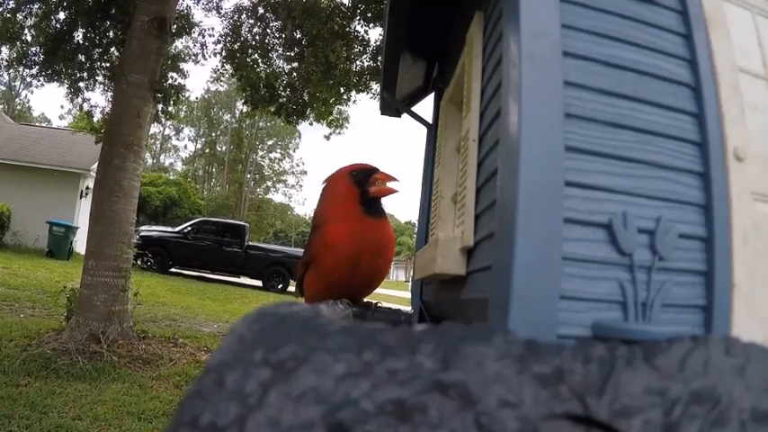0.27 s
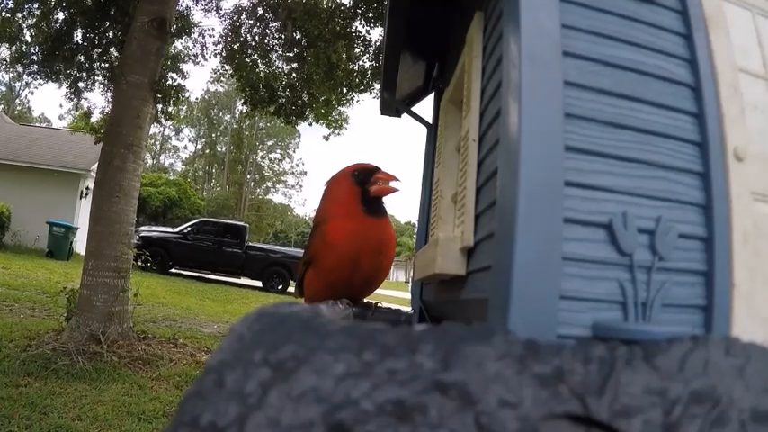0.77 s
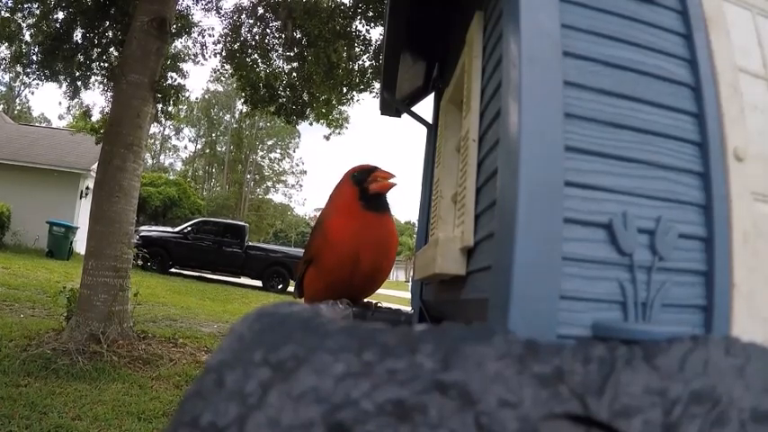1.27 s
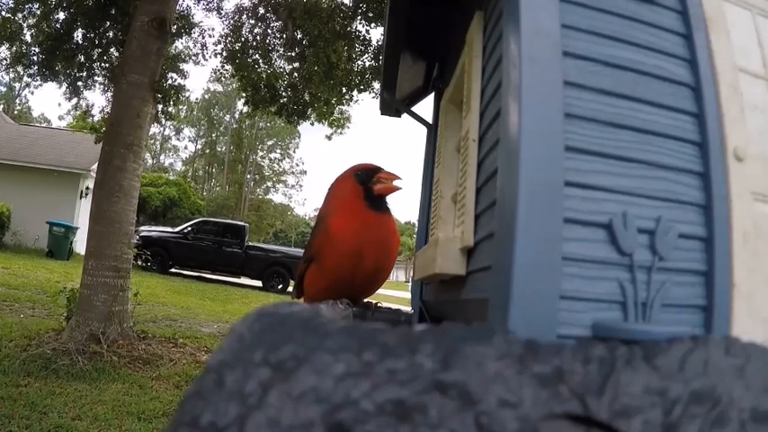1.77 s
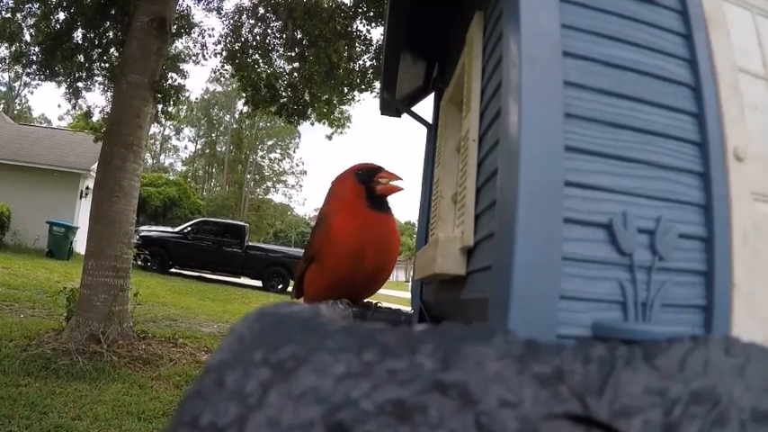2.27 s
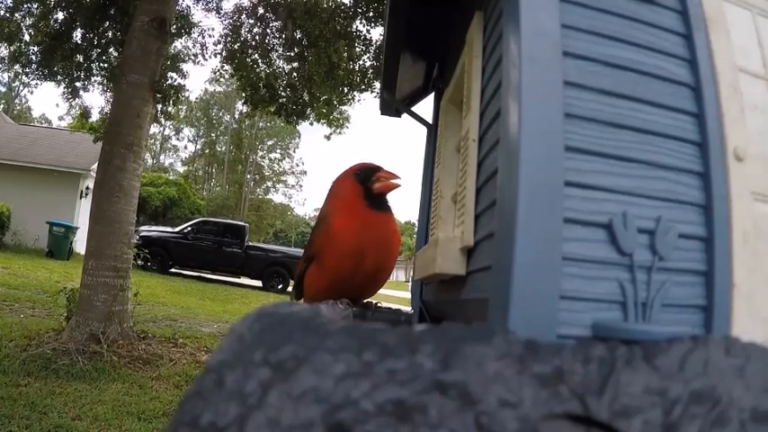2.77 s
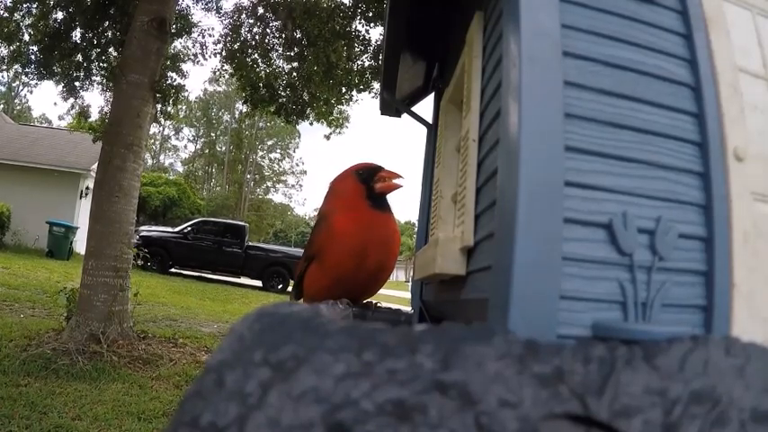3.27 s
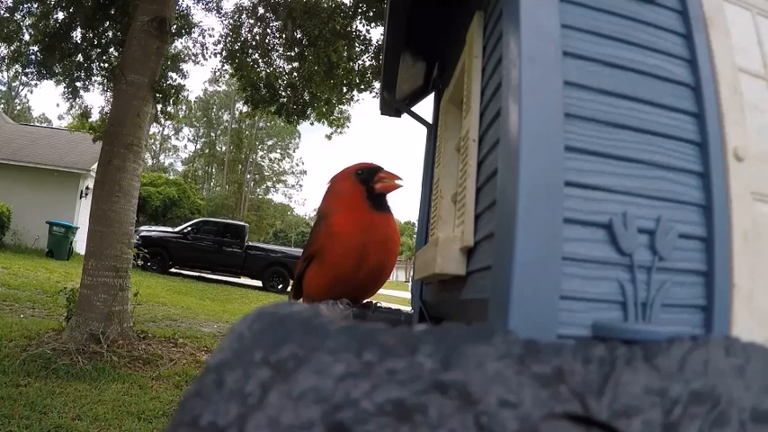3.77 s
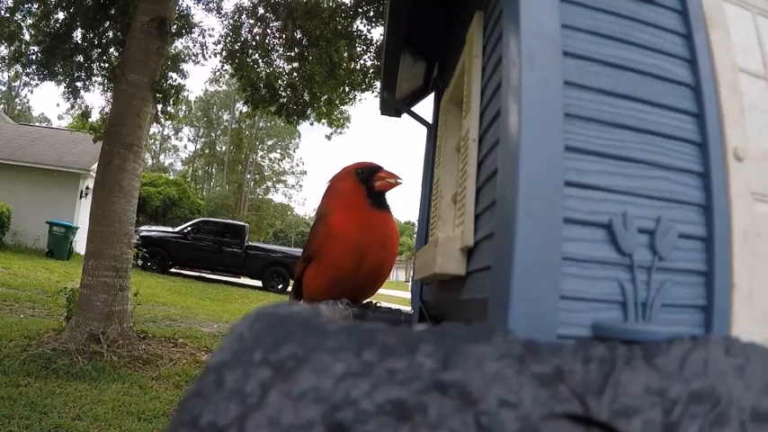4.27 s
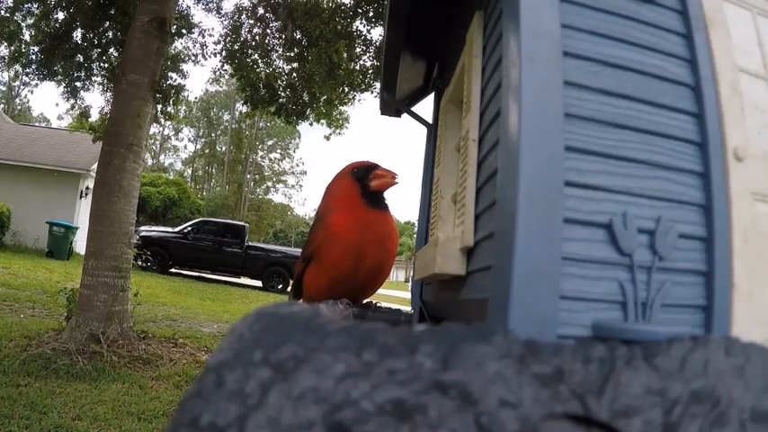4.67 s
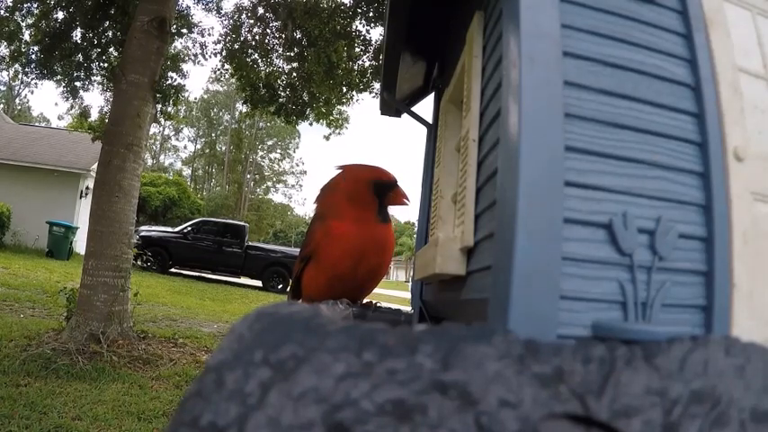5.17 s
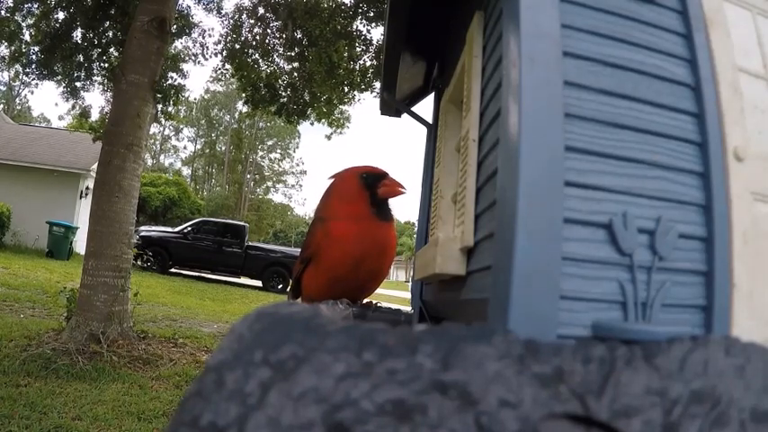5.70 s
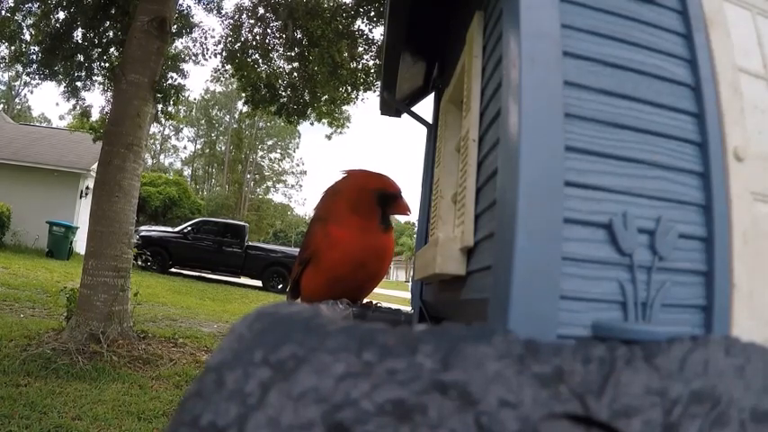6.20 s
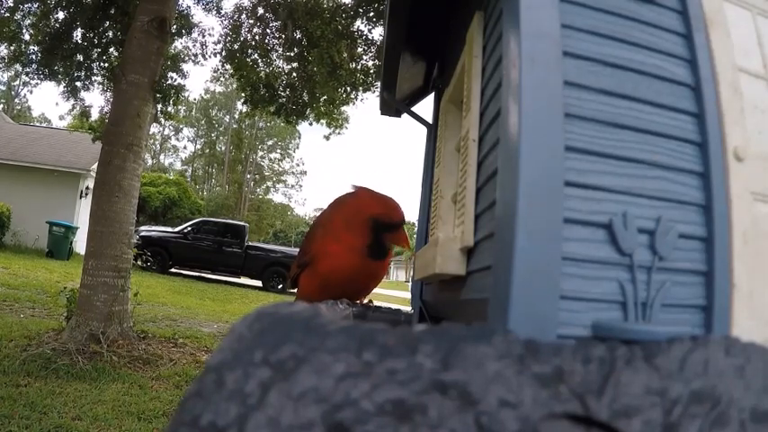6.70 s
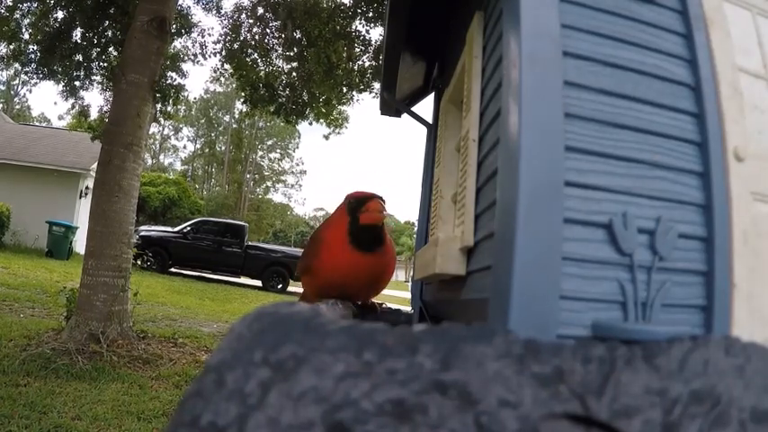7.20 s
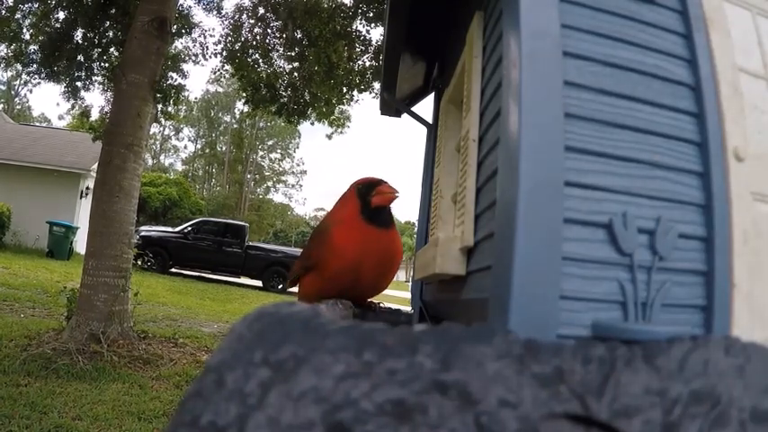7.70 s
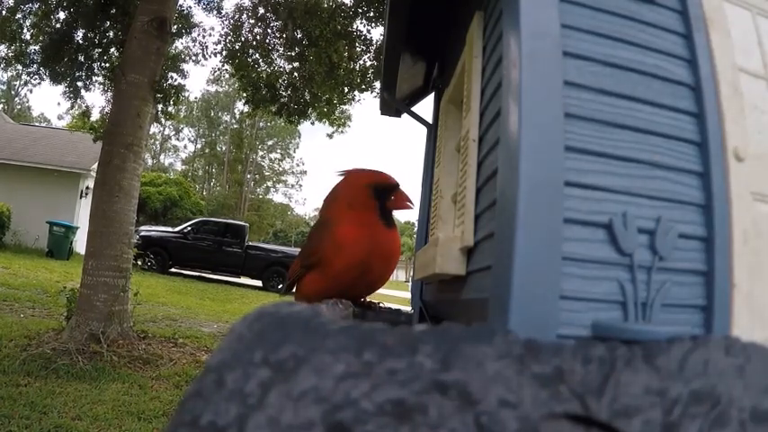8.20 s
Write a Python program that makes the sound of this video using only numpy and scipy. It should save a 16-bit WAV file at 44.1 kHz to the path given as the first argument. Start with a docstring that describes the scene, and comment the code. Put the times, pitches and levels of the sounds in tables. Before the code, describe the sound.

A songbird's slurred whistles and a closer bird's thin chips and beak clicks sound over gusty low wind rumble.

```python
"""Two cardinals in a front yard

The farther bird's whistles, swooping slurs and runs of arched notes, ring between house walls and trees.
The near bird's thin high chips, dry beak clicks and soft perch bumps fall in between. Wind buffets the
microphone, and far off a vehicle drones in the hum of the neighbourhood, under a faint hiss and whine."""
import sys
import numpy as np
from scipy import signal
from scipy.fft import rfft, irfft
from scipy.io import wavfile
from scipy.ndimage import uniform_filter1d, map_coordinates

SR = 44100
rng = np.random.default_rng(int(sys.argv[2]) if len(sys.argv) > 2 else 0)


def to_wav(sig):
    """Store sig (one row per channel, or 1-D mono) as 16-bit WAV at the path in sys.argv[1].

    Samples outside -1..1 are clipped; the rate is SR.
    """
    pcm = np.clip(np.atleast_2d(sig), -1, 1) * 32767
    pcm = np.round(pcm).astype(np.int16)
    wavfile.write(sys.argv[1], SR, pcm.T)  # frames by channels


N = 372644
TIME = np.arange(N) / SR

# A farther cardinal's swooping phrases. Each row: start in seconds, time stretch, levels in dB of the
# down-slur, hook, up-slur and closing low note, then direct-path gains in dB of down-slur and up-slur.
SWOOP_PHRASES = [(-.15, .95, -54, -49.5, -50.5, -55.5, 2, 3), (.179, .99, -50.7, -53, -47.2, -57, 2, 2),
                 (.528, 1, -53.5, -53.5, -47.5, -56.5, 1, 2), (5.687, .95, -58, -51.5, -51, -52.5, 1, -2),
                 (6.017, 1.01, -54.5, -50.3, -51.2, -52, .5, -2),
                 (6.351, .98, -55.7, -49, -50.7, -51.5, -.5, -2.5),
                 (6.685, .98, -53, -46.5, -50, -51.3, 1, -1.5),
                 (7.033, .98, -52, -50, -51.5, -49, 1.5, -1.5)]
# The four gestures of a swoop. Each row: seconds into the phrase, pitch in Hz, relative level in dB.
SWOOP_DOWN = [(-.012, 5900, -30), (-.001, 4930, -14), (.007, 4660, -4), (.022, 4330, 2.5), (.031, 4210, 0),
              (.04, 4110, -7), (.049, 3880, -1), (.066, 3250, -6), (.088, 2700, -11)]
SWOOP_HOOK = [(.09, 2700, -10), (.104, 2850, -7), (.111, 3130, -3), (.115, 3080, -1), (.118, 2500, -14),
              (.124, 1800, -21)]
SWOOP_UP = [(.122, 3680, -18), (.134, 3900, -9), (.142, 4280, -1), (.148, 4700, -2.5), (.154, 4950, -7),
            (.158, 5200, -20)]
SWOOP_CLOSE = [(.193, 2420, -20), (.209, 2560, -11), (.223, 2630, -2.5), (.236, 2560, -8.5),
               (.246, 2300, -14), (.26, 2130, -15)]
# Runs of arched notes. Each row: start in seconds, length in seconds, top pitch in Hz, level in dB,
# direct-path gain in dB as the head turns.
ARCHED_NOTES = [(1.242, .108, 2915, -54, -3), (1.477, .128, 2925, -53.7, -1.5),
                (1.733, .132, 2960, -53.7, -2), (1.993, .126, 2975, -51.5, 0),
                (2.25, .127, 2965, -52.2, 1.5), (4.642, .112, 2920, -56, -1),
                (4.885, .118, 2920, -53.8, -.5), (7.502, .115, 2980, -57, 1),
                (7.753, .113, 2965, -56.4, 2.3), (8.002, .123, 2970, -56, 2.3),
                (8.258, .124, 2975, -55, 2.3)]
# One arch. Each row: share of its length, share of the top pitch, relative level in dB.
ARCH_SHAPE = [(0, .83, -18), (.12, .875, -6.5), (.28, .955, -3.5), (.42, .99, -1), (.63, 1, .5),
              (.79, .988, 0), (.89, .94, -2), (1, .84, -7.5)]
# Echoes from walls close by and house fronts across the street. Each row: delay in seconds, gain in dB.
NEAR_WALLS = [(.0045, -13), (.016, -18), (.031, -20), (.052, -18)]
HOUSE_FRONTS = [(.105, -16), (.215, -18), (.33, -19)]


def song(gain_db=-1.7, low_direct_db=-2, trees_db=-1.3, beam_hz=3300):
    """The farther bird's song reaches the microphone directly, off the walls and through the trees."""
    lead = .5  # seconds of room for a phrase already under way
    direct, high, low = np.zeros((3, N + SR // 2))
    # below beam_hz the narrowing beak sends less of a slur straight to the microphone
    beam = signal.butter(4, beam_hz, "high", fs=SR, output="sos")
    gestures = (SWOOP_DOWN, SWOOP_HOOK, SWOOP_UP, SWOOP_CLOSE)
    registers = (high, low, high, low)
    for s, stretch, *levels, down_direct_db, up_direct_db in SWOOP_PHRASES:
        paths = (down_direct_db, low_direct_db, up_direct_db, low_direct_db)
        for gesture, register, db, direct_db in zip(gestures, registers, levels, paths):
            start = lead + s + gesture[0][0] * stretch
            note = undb(db) * whistle(gesture, stretch, waver=.01, flutter_db=2.7)
            add(register, start, note)
            aimed = signal.sosfilt(beam, note) if register is high else note
            add(direct, start, undb(direct_db) * aimed)
    for s, length, hz, db, direct_db in ARCHED_NOTES:
        note = undb(db) * whistle(ARCH_SHAPE, length, hz, waver=.0015, flutter_db=2.8)
        add(low, lead + s, note)
        add(direct, lead + s, undb(direct_db) * note)
    # leaves and air swallow the high slurs sooner than the lower notes
    high_scatter = foliage(high, t60=.75, early_t60=.17, early_db=.5, rise=.007, patchy_db=2)
    low_scatter = foliage(low, t60=1.2, early_t60=.22, early_db=0, rise=.008)
    out = direct + undb(trees_db) * (high_scatter + low_scatter)
    for delay, db in NEAR_WALLS:
        add(out, delay, undb(db) * (high + low))
    for delay, db in HOUSE_FRONTS:
        add(out, delay, undb(db) * low)
    return undb(gain_db) * out[-N:]


def whistle(gesture, stretch=1, pitch=1, waver=.0053, flutter_db=1.5):
    """The syrinx slides one pure tone along a gesture; pitch and pressure tremble a little."""
    s, hz, db = np.transpose(gesture)
    s = s * stretch
    t = np.arange(s[0], s[-1], 1 / SR)
    pitch_drift, level_drift = [map_coordinates(knots, [(t - s[0]) * 150], order=2, mode="wrap")
                                for knots in rng.standard_normal((2, 40))]
    glide = pitch * uniform_filter1d(np.interp(t, s, hz), size=120)
    phase = 2 * np.pi * np.cumsum(glide * (1 + waver * pitch_drift)) / SR
    level = undb(np.interp(t, s, db) + flutter_db * level_drift)
    to_edge = np.minimum(t - s[0], s[-1] - t)
    fade = np.sin(np.pi / 2 * np.clip(to_edge / .0025, 0, 1)) ** 2
    return np.sqrt(2) * fade * level * np.sin(phase)


def foliage(x, t60, early_t60, early_db, rise, patchy_db=-1.0):
    """Eaves, trunks and leaves round the yard scatter a quick dense cloud, then a longer faint tail."""
    t = np.arange(SR) / SR
    fade = undb(-60 * t / t60) + undb(early_db - 60 * t / early_t60)
    # each tree or wall sends back a clump of echoes of its own strength
    clumps = undb(patchy_db * drift(123.7)[:SR])
    response = rng.standard_normal(SR) * fade * clumps * np.clip(t / rise, 0, 1)
    return signal.fftconvolve(x, response / np.linalg.norm(response))[:len(x)]


# The near cardinal's thin high calls. Each row: start in seconds, top pitch in Hz, direct level in dB,
# echo level in dB before a common lift, echo rise in seconds.
CHIP_CALLS = [(1.414, 8030, -68, -58.5, .016), (3.223, 8020, -49.5, -57, .002),
              (4.877, 7780, -59, -59.3, .002), (6.913, 7620, -60, -60.5, .002),
              (8.224, 7780, -60, -58.5, .002)]
# One chip. Each row: time in seconds, share of the top pitch, relative level in dB.
CHIP_SHAPE = [(0, .73, -5), (.003, .81, -1), (.006, .91, -4), (.009, .96, 1), (.012, .98, .5),
              (.0155, 1, -12)]


def chips(echo_lift_db=5.5):
    """Very short rising contact notes; the turn of the head sets how much comes straight to the mic."""
    out = np.zeros(N)
    for s, hz, direct_db, echo_db, rise in CHIP_CALLS:
        note = np.pad(whistle(CHIP_SHAPE, pitch=hz), (0, SR // 2))
        echo = foliage(note, t60=.43, early_t60=.098, early_db=-10, rise=rise)
        add(out, s, undb(direct_db) * note)
        add(out, s, undb(echo_db + echo_lift_db) * echo)
    return out


# Snaps of the beak. Each row: start in seconds, level in dB, body and tip gains in dB,
# rebound delay in seconds, rebound gain in dB.
BEAK_CLICKS = [(1.4055, -57, -13, -28, .0075, -7), (2.285, -61, -8, 2, .005, -10),
               (3.586, -43.3, -3, 2.5, .0011, -12), (4.06, -63, -16, -22, .006, -2)]
# Beak resonances, two each for body, edge and tip. Each row: centre in Hz, width in Hz, gain in dB.
BEAK_MODES = [(1900, 1200, -7), (4810, 400, 0), (6400, 700, -8), (9000, 900, -16), (11800, 800, -10),
              (12900, 800, 0)]


def beak(scrape=.27, scrape_decay_s=.00023, wall_db=-10):
    """The beak snaps shut and rebounds more softly, and the nearest wall answers."""
    direct = np.zeros(N)
    t = np.arange(256) / SR
    for s, db, body_db, tip_db, rebound_s, rebound_db in BEAK_CLICKS:
        for delay, contact_db in ((0, db), (rebound_s, db + rebound_db)):
            snap = (t == 0) + scrape * rng.standard_normal(len(t)) * np.exp(-t / scrape_decay_s)
            rings = [undb(mode_db) * resonate(snap, hz, width) for hz, width, mode_db in BEAK_MODES]
            body, edge, tip = sum(rings[:2]), sum(rings[2:4]), sum(rings[4:])
            click = undb(body_db) * body + edge + undb(tip_db) * tip
            add(direct, s + delay, undb(contact_db) * unit(click))
    out = direct + undb(-7) * foliage(direct, t60=.05, early_t60=.022, early_db=-5, rise=.0034)
    add(out, NEAR_WALLS[0][0], undb(wall_db) * direct)
    return out


# The near bird shifts. Each row: start in seconds, peak level in dB, ring in Hz, push in seconds.
PERCH_BUMPS = [(6.172, -42.5, 158.3, 0.021), (6.838, -48, 470, 0.0046), (6.852, -49, 543, 0.0035),
               (6.871, -45, 428, 0.0036)]


def feet():
    """Each soft push knocks on the hollow perch."""
    out = np.zeros(N)
    t = np.arange(4096) / SR
    for s, db, hz, push in PERCH_BUMPS:
        force = rng.standard_normal(len(t)) * t * np.exp(-t / push)
        knock = resonate(resonate(force, hz, .5 * hz), hz, .5 * hz)
        add(out, s, undb(db) * knock / np.abs(knock).max())
    return out


# The breeze right on the microphone. Each row: time in seconds, level in dB.
BREEZE_LEVELS = [(0, -28), (.55, -41), (.9, -36), (1.149, -54), (1.7, -43), (2.1, -62), (2.4, -34.5),
                 (2.7, -44.5), (3.3, -36.5), (4.1, -41.5), (4.7, -40), (5.4, -42), (5.8, -35.5),
                 (6.549, -43.5), (6.902, -38), (7.25, -44.5), (7.8, -33.5), (8.45, -39)]
# Gusts that stand out of it. Each row: time of the peak in seconds, length in seconds, level in dB.
WIND_GUSTS = [(0.003, 0.091, -20), (0.116, 0.1, -20.5), (0.312, 0.078, -22), (2.29, 0.068, -36),
              (3.46, 0.12, -35), (3.589, 0.04, -29.5), (3.769, 0.13, -21), (3.947, 0.11, -24.5),
              (4.257, 0.1, -31.5), (4.42, 0.059, -30), (5.003, 0.14, -30.5), (5.279, 0.093, -26),
              (5.49, 0.23, -23.5), (6.201, 0.086, -30), (6.77, 0.11, -31.5), (7.081, 0.11, -34),
              (7.349, 0.082, -31.5), (7.644, 0.16, -25.5), (7.86, 0.083, -33.5), (8.13, 0.087, -25.5),
              (8.251, 0.06, -24.5)]
# Spectra of slow heavy eddies and quick small ones. Each row: frequency in Hz, relative level in dB.
HEAVY_EDDIES = [(12, -6.5), (20, 6.5), (29, -1), (48, -2.5), (65, -9.5), (110, -30)]
SMALL_EDDIES = [(40, -11.5), (62, -9), (85, -4), (120, -11), (170, -25), (300, -34.5), (600, -50)]


def wind(puffs_per_s=8.7, puff_db=3.5, flutter_db=-15.5, lull_db=-48):
    """Gusts and a puffing breeze push on the microphone; a harder push sheds more small eddies."""
    s, db = np.transpose(BREEZE_LEVELS)
    push = undb(np.interp(TIME, s, db) + puff_db * drift(puffs_per_s))
    for peak, length, gust_db in WIND_GUSTS:
        gust = undb(gust_db) * np.exp(-(2 * (TIME - peak) / length) ** 2)
        push = np.hypot(push, gust)
    flutter = np.hypot(undb(lull_db), undb(flutter_db) * push)
    return push * eddies(HEAVY_EDDIES) + flutter * eddies(SMALL_EDDIES)


def eddies(spectrum):
    """Turbulence of even strength, so that the wind's push alone sets its level."""
    turbulence = noise(spectrum)
    return turbulence / np.sqrt(uniform_filter1d(turbulence ** 2, size=4000))


# An engine a long way off. Each row: time in seconds, firing rate in Hz, level in dB.
ENGINE_RUN = [(0, 42.72, -56), (.55, 43.33, -39), (1.1, 42.63, -54), (1.6, 44.03, -50), (1.951, 54.05, -55),
              (2.3, 48.8, -49), (2.7, 46.63, -48.5), (3.399, 43.2, -56), (4.301, 39.97, -47.5),
              (6, 39.6, -71), (8.45, 36.8, -68)]
# Its exhaust tones. Each row: multiple of the firing rate, relative level in dB.
EXHAUST_ORDERS = [(2, -3), (2.5, -14.5), (3, -8.5), (4, -16.5)]


def vehicle(wander=.0112, rough_db=4.0, gain_db=1.5):
    """Only the lowest exhaust orders of a far engine carry into the yard."""
    s, hz, db = np.transpose(ENGINE_RUN)
    firing_hz = np.interp(TIME, s, hz) * (1 + wander * drift(15))
    phase = 2 * np.pi * np.cumsum(firing_hz) / SR
    drone = sum(undb(order_db + rough_db * drift(16)) * np.sin(order * phase)
                for order, order_db in EXHAUST_ORDERS)
    return unit(drone) * undb(np.interp(TIME, s, db) + gain_db)


# The steady air of the neighbourhood, low and high. Each row: frequency in Hz, relative level in dB.
TRAFFIC_SPECTRUM = [(88, -27.5), (150, 6.5), (167, 2), (214, -2), (269, -4.5), (313, -3.5), (357, -3),
                    (458, -0.5), (516, -3.5), (557, -6.5), (805, -14.5), (917, -13.5), (1180, -20),
                    (1370, -21), (2000, -25.5), (2600, -50), (4400, -120)]
HISS_SPECTRUM = [(1180, -8.5), (2000, 1.5), (2370, 4), (2560, 5), (3000, 5.5), (3240, 2), (4820, 3),
                 (5200, 1.5), (6480, -2), (7110, -3.5), (10100, -7.5), (13500, -9), (14100, 2), (14700, -9),
                 (15100, -8)]
# Tones from the camera's electronics. Each row: frequency in Hz, level in dB.
WHINE_TONES = [(8630, -91), (14087, -99)]


def background(hum_db=-55, hiss_db=-66):
    """Distant traffic hum, smooth hiss and a faint, slightly unsteady electronic whine."""
    hum = noise(TRAFFIC_SPECTRUM) * undb(hum_db + .5 * drift(3.23))
    hiss = noise(HISS_SPECTRUM) * undb(hiss_db + drift(9.1))
    whine = sum(np.sqrt(2) * undb(db) * np.sin(2 * np.pi * hz * TIME + drift(7.6))
                for hz, db in WHINE_TONES)
    return hum + hiss + whine


def undb(db):
    """Decibels to gain."""
    return 10 ** (np.asarray(db) / 20)


def unit(x):
    """Scale to rms 1."""
    return x / np.sqrt(np.mean(x ** 2))


def add(out, s, x):
    """Mix x into out from s seconds on."""
    start = int(round(s * SR))
    first, end = max(start, 0), min(start + len(x), len(out))
    if end > first:
        out[first:end] += x[first - start:end - start]


def drift(rate):
    """Smooth random drift through `rate` values a second, with a spread near 1."""
    knots = rng.standard_normal(4096)
    return map_coordinates(knots, [TIME * rate], order=2, mode="wrap")


def noise(spectrum):
    """Noise of rms 1, shaped by (Hz, dB) points."""
    hz, db = np.transpose(spectrum)
    bins_hz = np.maximum(np.fft.rfftfreq(N, 1 / SR), 1)
    gain = undb(np.interp(np.log(bins_hz), np.log(hz), db, left=-200, right=-200))
    return unit(irfft(rfft(rng.standard_normal(N)) * gain, N))


def resonate(x, hz, width):
    """Two-pole resonance with gain 1 at its centre."""
    return signal.lfilter(*signal.iirpeak(hz, hz / width, fs=SR), x)


def scene():
    """A far singing cardinal, a near chipping bird, the wind and the neighbourhood at one microphone."""
    return (song() + chips() + beak() + feet() + wind() + vehicle() + background())[None]


def record(dry):
    """The camera cuts the highest treble steeply."""
    top_hz = 15230
    return signal.sosfilt(signal.ellip(12, .1, 80, top_hz, fs=SR, output="sos"), dry)


dry = scene()
out = record(dry)
to_wav(out)
```